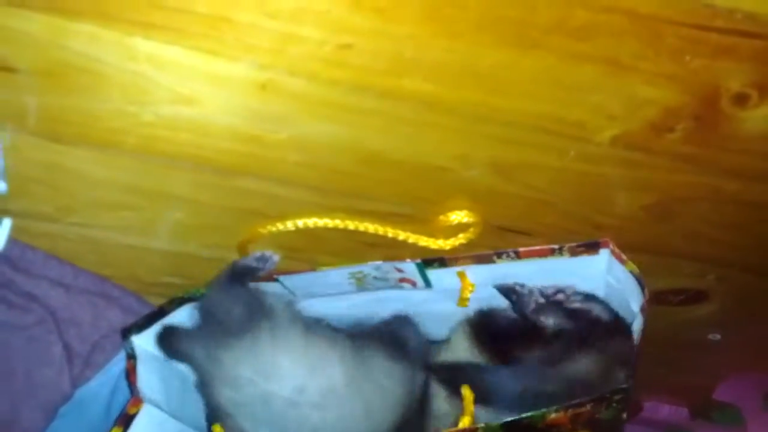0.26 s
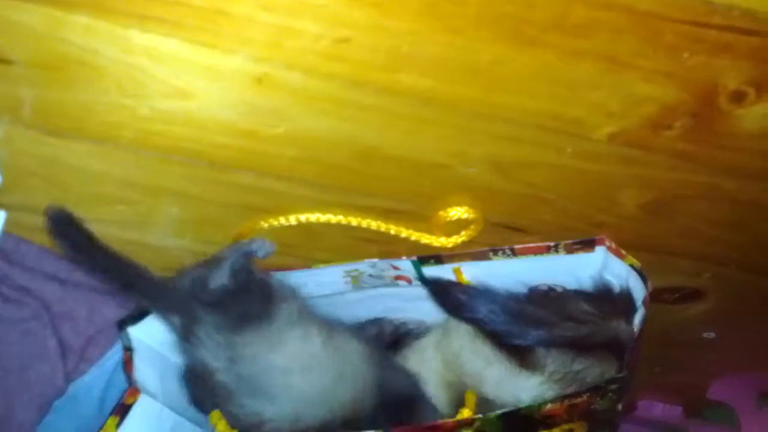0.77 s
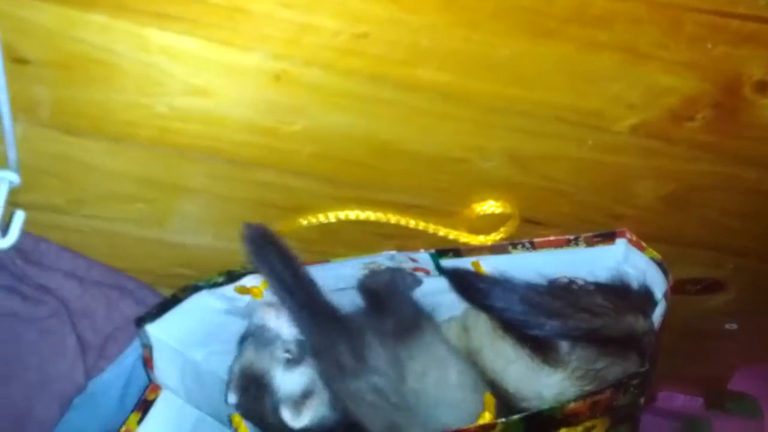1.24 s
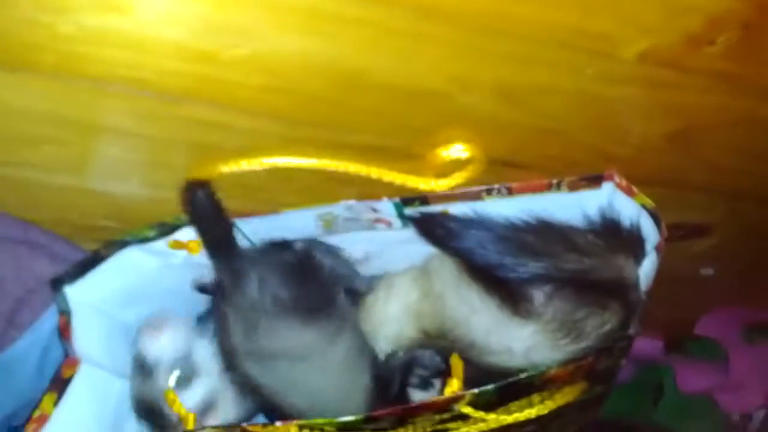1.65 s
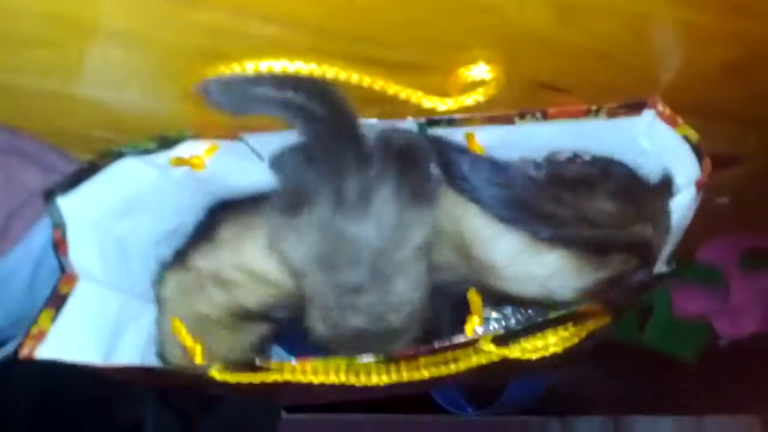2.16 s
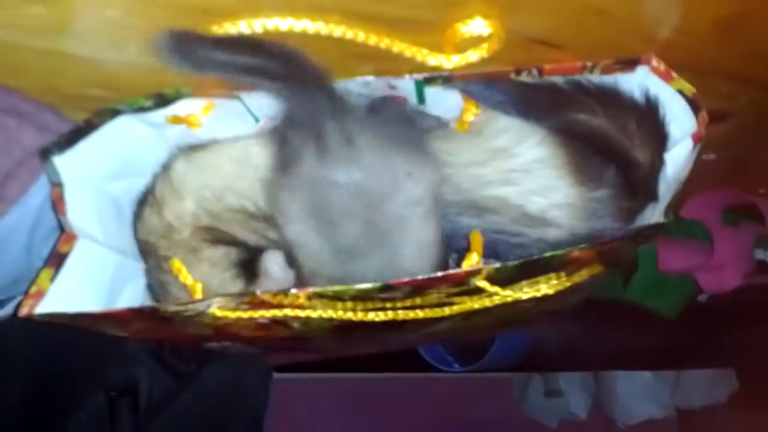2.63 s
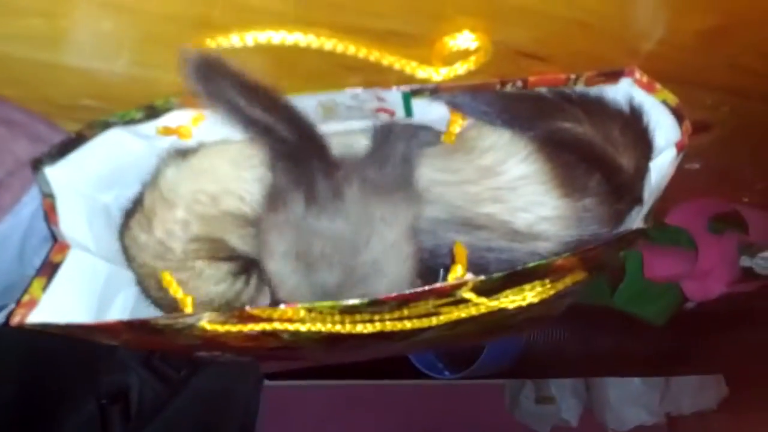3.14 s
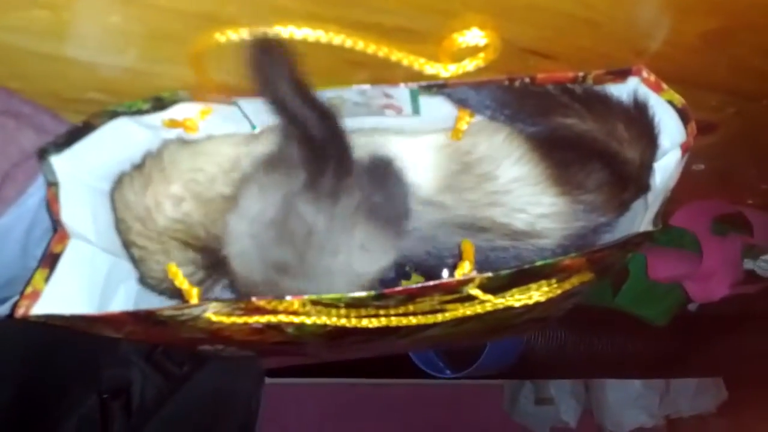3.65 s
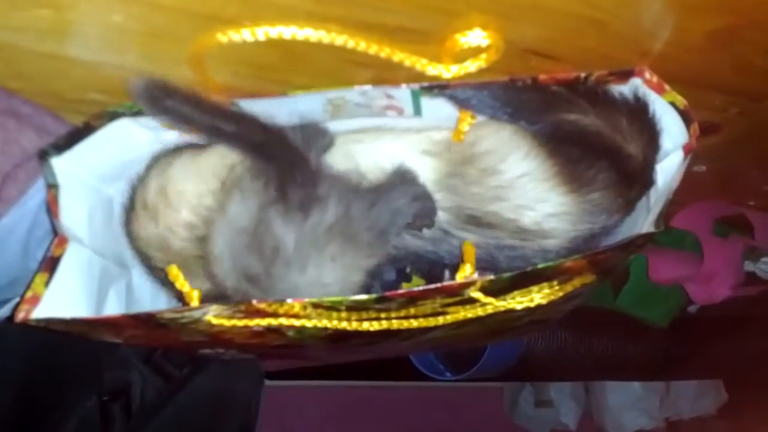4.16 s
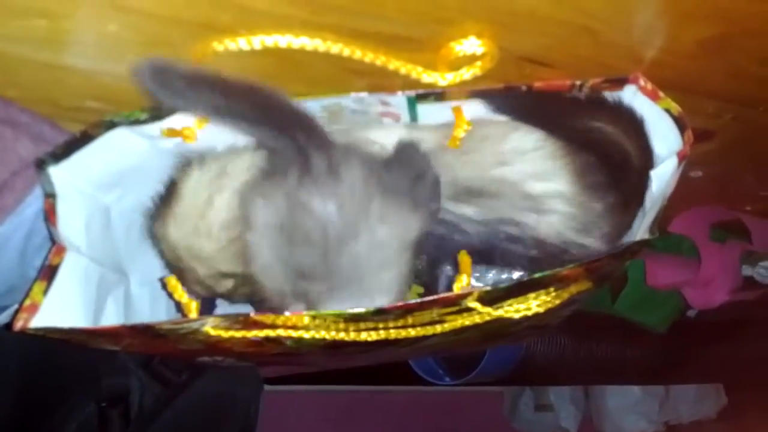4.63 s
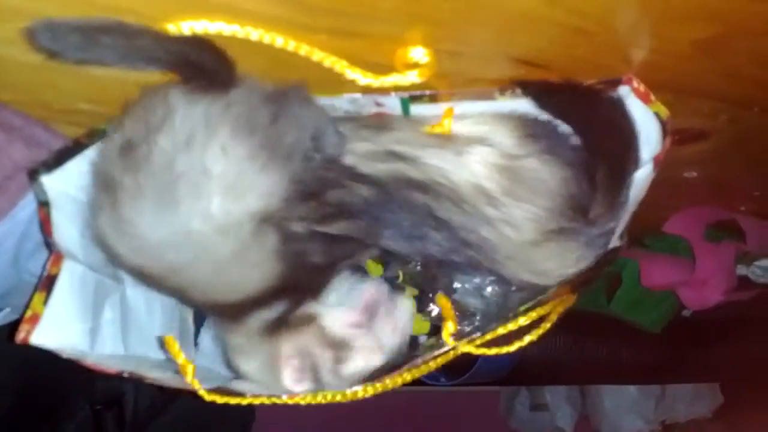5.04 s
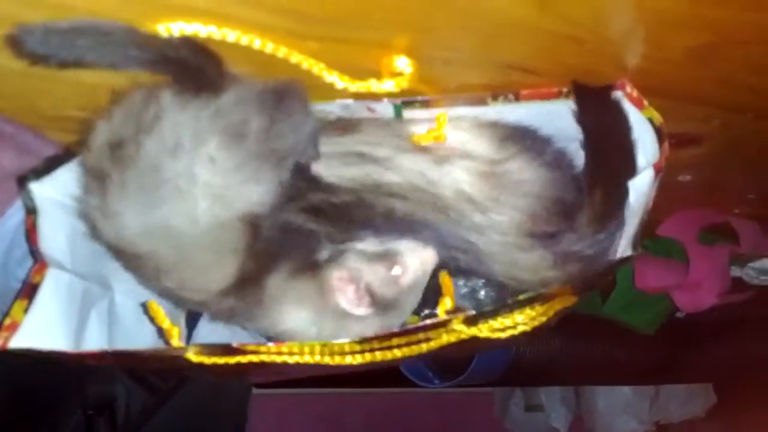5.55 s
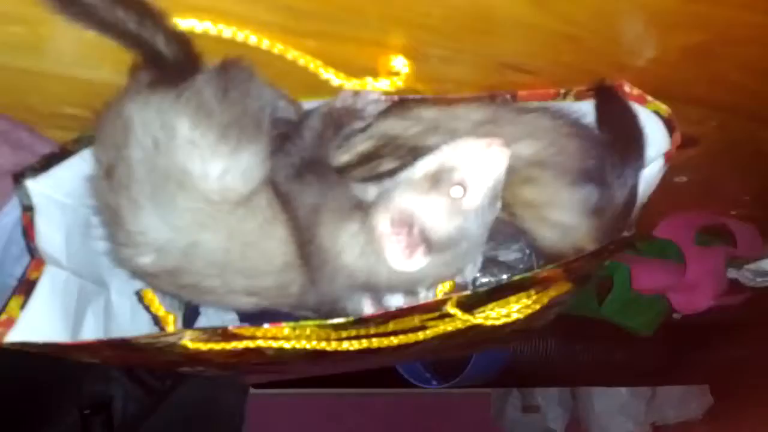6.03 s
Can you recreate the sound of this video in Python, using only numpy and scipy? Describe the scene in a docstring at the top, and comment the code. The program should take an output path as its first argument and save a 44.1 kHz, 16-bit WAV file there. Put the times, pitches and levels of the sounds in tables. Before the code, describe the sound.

Close, dry paper-bag crinkling in uneven bursts as two small furry animals wrestle, creases snapping brightly over scratchy rustle and soft dull thumps.

```python
"""Two ferrets wrestle in a stiff paper gift bag on a wooden floor, close to a small microphone.
Creases snap over one by one: noise cracks with short sine rings of fold and wall.
Fur and claws rustle along the walls as coloured noise grains that follow each stroke.
Bodies thump the bag against the boards as low, swelling sine pushes.
A low room rumble and hiss, coloured noise of slowly drifting level, lie underneath."""
import sys
import numpy as np
from scipy import signal
from scipy.fft import rfft, irfft
from scipy.io import wavfile

SR = 44100
rng = np.random.default_rng(int(sys.argv[2]) if len(sys.argv) > 2 else 0)


def digitize_waveform(pressure):
    """Quantize a signal to 16-bit integers and store it at the path in sys.argv[1].

    Rows of a 2-D input are taken as channels; values are limited to [-1, 1].
    """
    field = np.atleast_2d(pressure).T
    bounded = np.clip(field, -1, 1)
    quanta = np.round(bounded * 32767).astype(np.int16)
    wavfile.write(sys.argv[1], SR, quanta)


N = 277389

# Room tone around the bag, low rumble to hiss: [pitch_hz, density_db_per_hz]
ROOM_SPECTRUM = [(8.8, -28), (15, 6.5), (150, -11.5), (195, -16), (606, -39.5), (910, -48), (2120, -46.5),
                 (4650, -31.5), (8570, -34.5), (12500, -20.5), (15800, -28)]
ROOM_LEVEL_DB = -59.5

# Bodies against the floor: [start_s, peak_db, pitch_hz, swell_s, first_push (1 outward, -1 inward)]
BODY_THUMPS = [(0.344, -47, 46.4, 0.016, -1), (0.382, -48, 53.6, 0.0051, -1), (1.361, -51, 134, 0.0069, 1),
               (1.987, -37, 106, 0.0062, 1), (1.999, -38, 85.5, 0.0096, 1), (2.28, -42.5, 103, 0.0079, 1),
               (3.908, -34, 70.4, 0.0062, 1), (4.816, -40, 48, 0.0099, -1), (5.051, -41, 64, 0.005, -1),
               (5.081, -38, 44.3, 0.0046, -1), (5.296, -37.5, 75.5, 0.0021, 1),
               (5.43, -33.5, 108, 0.00091, 1), (5.45, -43, 97, 0.0044, -1), (5.477, -47, 100, 0.0034, -1),
               (6.079, -49, 89, 0.004, -1)]

# Colour of paper crackle: [pitch_hz, density_db_per_hz]
CRACKLE_SPECTRUM = [(1180, -22.5), (2000, -7), (3160, -6.5), (4240, -1), (6370, -2), (7980, -3.5),
                    (10300, 1), (11000, -0.5), (14200, 4), (15100, 0), (15800, 2)]
# Colour of the flexing walls: [pitch_hz, density_db_per_hz]
FLEX_SPECTRUM = [(71, -15.5), (120, -6), (151, -2.5), (372, -0.5), (414, -5), (1180, -4), (2260, -10.5),
                 (3000, -12.5), (3900, -15.5), (6600, -120)]

# Restless shifting between the strokes: [time_s, bright_rustle_db, dull_flex_db]
RESTLESS_SHIFTING = [(0.0, -52.5, -68), (0.66, -55.5, -65.5), (1.03, -53.5, -65), (1.21, -55, -63.5),
                     (1.61, -52, -61.5), (1.96, -46, -53), (2.14, -47.5, -59), (2.43, -54, -66.5),
                     (2.94, -59.5, -64), (3.28, -54.5, -66), (3.59, -63, -67.5), (4.45, -58, -67.5),
                     (4.62, -46, -60.5), (4.82, -48, -55.5), (5.19, -55, -69), (5.76, -56.5, -64),
                     (6.08, -55.5, -60.5), (6.29, -55.5, -62)]
# Strokes of a body along the paper: [full_strength_s, hold_s, bright_rustle_db, dull_flex_db]
BODY_STROKES = [(0.08, .005, -47.5, -50.5), (0.156, 0.033, -48, -57.5), (0.36, 0.024, -49.5, -51.5),
                (.56, 0.017, -55, -67), (0.819, .005, -38.5, -49.5), (0.937, .05, -46.5, -54),
                (1.122, 0.014, -53, -56), (1.209, .02, -46.5, -61), (1.352, .02, -49.5, -56),
                (1.516, .03, -53.5, -57), (1.719, 0.028, -48.5, -66), (1.775, .005, -42, -48.5),
                (1.884, .04, -41, -53), (1.97, .04, -45.5, -47.5), (2.095, .005, -40.5, -47),
                (2.215, .03, -42, -47.5), (2.365, 0.022, -50.5, -59.5), (2.453, 0.007, -54.5, -59),
                (2.628, .01, -52, -62.5), (2.752, .01, -53, -54), (3.172, .02, -44, -51),
                (3.4, 0.0042, -62, -58), (3.91, .02, -53.5, -63.5), (4.176, .01, -51, -55.5),
                (4.463, .01, -46.5, -49.5), (4.497, .005, -40.5, -47.5), (4.648, .03, -47, -50.5),
                (4.741, .03, -45.5, -52), (4.874, .06, -48.5, -54), (5.049, .02, -50, -53),
                (5.122, .02, -52, -67), (5.178, 0.0081, -57, -53.5), (5.344, 0.0044, -43, -51),
                (5.441, .02, -49.5, -56.5), (5.49, .04, -48.5, -55), (5.853, .03, -56, -65.5),
                (5.918, .04, -50.5, -56), (6.026, .01, -56, -51), (6.082, .01, -52, -59.5),
                (6.222, .06, -50, -59.5)]
STROKE_RISE_DB_PER_S, STROKE_FALL_DB_PER_S = 220.5, 177.5

# Crease snaps and wall knocks, strong and faint, each at its own time:
# [full_swell_s, crack_peak_db, crease_ring_db, panel_knock_db, panel_pitch_hz]
# (the two ring levels are those before the swell and the decay)
TIMED_SNAPS = [(.0341, -23.5, -39, -39.5, 1530), (.064, -14.5, -32, -36.5, 705),
               (.0893, -50, -42, -31.5, 2540), (.1415, -35, -38, -42, 1020), (.1562, -44, -34, -38.5, 1150),
               (.2365, -24.5, -52, -47, 1030), (.2967, -20, -36, -37, 430), (.2988, -18.5, -33, -38, 2470),
               (.3588, -27.5, -57, -53, 510), (.4129, -27.5, -33, -55, 990), (.4832, -31.5, -34, -50, 2120),
               (.5754, -27, -42, -54, 600), (.792, -24, -51, -37.5, 500), (.806, -42, -29.5, -41, 540),
               (.819, -36, -45, -36, 1260), (.8386, -23, -41, -39, 1140), (.8492, -18.5, -47, -43, 1090),
               (.8985, -24.5, -34, -45.5, 1500), (.9454, -22, -52, -50, 1060),
               (.962, -41, -31.5, -46.5, 527), (.9976, -22.5, -40, -39, 387), (1.0669, -37, -43, -53, 870),
               (1.0866, -44, -43, -44, 1130), (1.1245, -38, -46, -50, 390), (1.2202, -15, -33, -51, 2300),
               (1.254, -25, -56, -62, 1040), (1.3024, -29.5, -38, -39.5, 900), (1.353, -37, -56, -48, 1170),
               (1.367, -28, -50, -48, 750), (1.5118, -19.5, -45, -44, 1140), (1.5416, -24, -49, -55, 500),
               (1.7161, -25.5, -31, -41, 1200), (1.7531, -16.5, -27.5, -31, 1270),
               (1.76, -16, -42, -33, 1150), (1.788, -10, -21, -33, 1150), (1.7905, -12.5, -28, -31, 1070),
               (1.7945, -13, -41, -33, 1560), (1.801, -30, -36, -36, 1280), (1.8402, -43, -44, -53, 1320),
               (1.9187, -17, -47, -60, 2340), (1.9337, -31, -49, -57, 330), (1.9383, -41, -47, -34, 1280),
               (1.9588, -19, -46, -34, 1770), (1.9643, -12.5, -28, -46, 640), (1.9677, -23, -29, -27, 730),
               (1.9705, -15, -34, -34, 1870), (1.9898, -27, -37, -30, 905), (1.9985, -22, -36, -28.5, 323),
               (2.0192, -25, -47, -51, 340), (2.0304, -17, -43, -60, 360), (2.0702, -17, -33, -34, 600),
               (2.0766, -24, -36, -33, 1200), (2.0984, -19, -26, -36, 620), (2.105, -25, -34, -33.5, 2440),
               (2.1887, -17, -30, -44, 525), (2.1995, -19, -38, -32, 740),
               (2.2032, -14.5, -41, -28.5, 1220), (2.2147, -17, -40, -41, 1380),
               (2.22, -31, -47, -36, 1320), (2.2306, -23, -29, -38, 1090), (2.2385, -17.5, -24, -36, 644),
               (2.3084, -26, -43, -40.5, 390), (2.3585, -32, -44, -36.5, 950),
               (2.3617, -15.5, -49, -60, 1030), (2.4192, -26, -32, -47, 1380),
               (2.4515, -37, -58, -38.5, 1220), (2.4592, -26.5, -43, -46.5, 442),
               (2.5892, -23, -38, -42, 1140), (2.6194, -24.5, -32, -41.5, 1590),
               (2.6294, -23, -38.5, -57, 950), (2.641, -27, -55, -51, 1250), (2.6908, -27.5, -56, -42, 960),
               (2.706, -29, -54, -45, 1590), (2.7323, -25, -61, -44, 1550), (2.76, -20.5, -55, -33, 1330),
               (2.7741, -20.5, -53.5, -42.5, 1240), (2.7862, -19, -44, -37, 1360),
               (2.8102, -32, -44, -60, 1430), (2.8441, -29, -60, -47, 1420),
               (2.8658, -31.5, -58, -65, 1660), (2.996, -22.5, -37, -35, 1390),
               (3.0854, -26, -51, -44.5, 1480), (3.1174, -19.5, -34, -41, 1350),
               (3.131, -38, -51, -50, 1300), (3.1445, -20, -42, -30, 1130), (3.147, -19, -32, -41.5, 1210),
               (3.162, -16, -38, -37, 1420), (3.1683, -17, -29, -28, 1230), (3.178, -17, -30, -53, 1260),
               (3.1886, -16.5, -33, -29.5, 613), (3.195, -19.5, -54, -32.5, 1420),
               (3.217, -31, -39, -36, 1510), (3.2221, -16, -48, -40, 484), (3.268, -39, -42, -48, 1400),
               (3.3266, -51, -49, -46, 1420), (3.3553, -34, -44, -43, 1300),
               (3.3593, -32, -45, -37.5, 1470), (3.409, -24.5, -48, -32.5, 1390),
               (3.4749, -29, -51, -42, 1230), (3.5323, -25, -57, -49, 480), (3.6255, -62, -60, -48.5, 2620),
               (3.7472, -38.5, -44, -40, 1320), (4.1561, -25, -33, -37.5, 790),
               (4.178, -19.5, -53, -31.5, 1260), (4.1978, -25.5, -39, -40, 1600),
               (4.2412, -27, -50, -48, 1310), (4.2805, -28.5, -41.5, -45.5, 1270),
               (4.4268, -27, -35, -42.5, 1640), (4.46, -19.5, -38, -38, 1300),
               (4.502, -14, -30.5, -36.5, 1520), (4.521, -35, -48, -46, 1630), (4.5578, -45, -53, -61, 750),
               (4.593, -39, -40, -42, 1210), (4.62, -18, -35, -37, 1480), (4.6232, -30, -42, -32, 1530),
               (4.663, -24, -38, -44, 1250), (4.6835, -25, -42, -43, 1160), (4.7, -22, -39, -41, 1250),
               (4.7051, -19, -36, -46, 600), (4.7619, -15.5, -40, -37, 1250),
               (4.8147, -28.5, -54, -60, 2420), (4.8417, -30, -42, -39, 1100), (4.859, -36, -32, -47, 686),
               (4.8727, -39, -37.5, -53, 1100), (4.902, -18, -39, -33, 1310), (4.9074, -23, -31, -34, 1350),
               (4.931, -28, -34, -40, 2000), (4.9757, -26, -32, -31, 1140), (5.017, -45, -44, -36, 623),
               (5.069, -42, -51, -41.5, 1140), (5.138, -33, -45, -43, 1220), (5.166, -50, -72, -44, 546),
               (5.215, -29, -41, -42.5, 475), (5.2976, -58, -61, -34.5, 850), (5.3453, -28, -52, -36, 1460),
               (5.3484, -19, -36, -32, 1290), (5.4309, -45, -37, -39, 815), (5.5214, -43, -33, -39, 1040),
               (5.5842, -30, -35, -37, 1340), (5.811, -54, -62, -37, 760), (5.828, -26.5, -57, -44, 320),
               (5.928, -26, -52, -45, 1610), (5.9733, -54, -61, -43, 860), (6.0228, -50, -57, -28.5, 1000),
               (6.0376, -23, -44, -55, 460), (6.0745, -43, -51, -45, 930)]
FLIP_S = 0.00073   # time for a fold to tear over to its full swell
CRACK_T60_S = 0.0045   # typical; each snap varies around it
SHIVER_T60_S, SHIVER_DB = 0.04, -17   # the paper shivers on after each snap, level against the crack
CREASE_HZ, CREASE_T60_S = 4530, 0.0038   # typical pitch of a fold
PANEL_T60_S = 0.0091

# Further small snaps fall at random, thicker where the rustle is louder
SMALL_COUNT = 80
SMALL_PANEL_HZ, SMALL_PANEL_SPREAD = 1114, 0.408   # typical pitch; spread as a natural-log ratio
SMALL_OVER_RUSTLE_DB, SMALL_SPREAD_DB = 9, 3.5
SMALL_CREASE_DB, SMALL_PANEL_DB = -13, -14   # against the typical small crack

TOP_CUT_HZ = 15800   # upper edge of the sound's band


def amp(db):
    """Turn decibels into an amplitude factor."""
    return 10 ** (np.asarray(db) / 20)


def rms_one(x):
    """Scale a signal to an rms of 1."""
    return x / np.sqrt(np.mean(x ** 2) + 1e-20)


def colour(x, spectrum):
    """Shape by a (Hz, dB) spectrum with a causal, minimum-phase response."""
    hz, db = np.transpose(spectrum)
    grid = np.maximum(np.arange(4097) * SR / 8192, 1)
    log_gain = np.interp(np.log(grid), np.log(hz), db) * np.log(10) / 20
    # folding the cepstrum onto positive time makes the response minimum-phase
    cepstrum = irfft(log_gain)
    cepstrum[1:4096] *= 2
    cepstrum[4097:] = 0
    response = irfft(np.exp(rfft(cepstrum)))
    return signal.fftconvolve(x, response)[:N]


def drift(rate_hz):
    """Slow chance wander with an rms of 1: noise through two equal low-pass poles."""
    pole = np.exp(-2 * np.pi * rate_hz / SR)
    noise = rng.standard_normal(N + SR)
    wander = signal.lfilter([1], [1, -2 * pole, pole * pole], noise)
    return rms_one(wander[SR:])   # the first second lets the filter settle


def fade(t, t60):
    """Exponential decay that loses 60 dB in t60 seconds."""
    return amp(-60 * t / max(t60, 1e-3))


def add(out, start_s, sound):
    """Lay a sound into the scene at its start time."""
    at = max(round(start_s * SR), 0)
    out[at:at + len(sound)] += sound[:N - at]


def room_tone():
    """Rumble and hiss of the room: steady coloured noise whose level wanders a little."""
    level_db = ROOM_LEVEL_DB + 0.63 * drift(3.8)
    noise = rng.standard_normal(N)
    return amp(level_db) * rms_one(colour(noise, ROOM_SPECTRUM))


def thumps():
    """A soft body shoves the bag: a cycle or two of low air push that swells in and dies."""
    out = np.zeros(N)
    t = np.arange(SR // 5) / SR
    for start_s, peak_db, pitch_hz, swell_s, first_push in BODY_THUMPS:
        wall = np.sin(2 * np.pi * pitch_hz * t)
        wall = wall + 0.18 * np.sin(2 * np.pi * 2.52 * pitch_hz * t)   # stiffer overtone
        push = wall * t * np.exp(-t / max(swell_s, 1e-3))
        add(out, start_s, np.sign(first_push) * amp(peak_db) * push / np.abs(push).max())
    return out


def effort():
    """Bright and dull rustle level in dB: each stroke rises, holds and falls over the shifting."""
    t = np.arange(0, N / SR + .01, .002)
    shift_s, *shift_levels = np.transpose(RESTLESS_SHIFTING)
    power = amp([np.interp(t, shift_s, db) for db in shift_levels]) ** 2
    for full_s, hold_s, *levels_db in BODY_STROKES:
        rise_loss = STROKE_RISE_DB_PER_S * np.maximum(full_s - t, 0)
        fall_loss = STROKE_FALL_DB_PER_S * np.maximum(t - full_s - hold_s, 0)
        power = power + amp(np.c_[levels_db] - (rise_loss + fall_loss)) ** 2
    sample_s = np.arange(N) / SR
    return [np.interp(sample_s, t, 10 * np.log10(p)) for p in power]


def grains(clumps, per_s, spread_db, t60, rub):
    """Tiny noise bursts of uneven size over a smooth rub, both following the clumps; rms 1."""
    born = rng.random(N) < per_s * clumps / SR
    sizes = amp(spread_db * np.minimum(rng.exponential(1, N), 3)) * born
    pole = fade(1 / SR, t60)
    # two equal poles: each grain swells and dies
    envelope = signal.lfilter([1], [1, -2 * pole, pole * pole], sizes + 1e-18)
    return rms_one((rms_one(envelope) + rub * clumps) * rng.standard_normal(N))


def rustle(bright_db, dull_db):
    """Fur and claws drag on the paper in small jerks; the walls flex with a duller crumple in step."""
    jerks = amp(2.0 * drift(31))
    crisp = grains(jerks, per_s=250, spread_db=6.0, t60=0.0029, rub=1.9)
    # the hiss of fur and the lower scrape of claws swell apart from each other
    low_pass = signal.butter(2, 7000, fs=SR, output="sos")
    scrape = signal.sosfilt(low_pass, crisp)
    hiss = crisp - scrape
    fine = rms_one(colour(amp(3.5 * drift(11.3)) * scrape + hiss, CRACKLE_SPECTRUM))
    crumple = grains(jerks, per_s=200, spread_db=2.0, t60=0.011, rub=0.56)
    flex = rms_one(colour(crumple, FLEX_SPECTRUM))
    return amp(bright_db) * fine + amp(dull_db) * flex


def small_snaps(bright_db):
    """Rows like those of the timed snaps, drawn by chance where the paper is being worked."""
    share = np.cumsum(amp(.5 * bright_db))
    # one chance draw in each equal share of the rustling
    slot = (np.arange(SMALL_COUNT) + rng.random(SMALL_COUNT)) / SMALL_COUNT
    at = np.minimum(np.searchsorted(share / share[-1], slot), N - 1)
    chance = np.clip(rng.standard_normal((SMALL_COUNT, 4)), -1.5, 1.5)
    typical_db = bright_db[at] + SMALL_OVER_RUSTLE_DB
    part_db = np.c_[[0, SMALL_CREASE_DB, SMALL_PANEL_DB]]
    levels_db = typical_db + SMALL_SPREAD_DB * chance[:, :3].T + part_db
    panel_hz = SMALL_PANEL_HZ * np.exp(SMALL_PANEL_SPREAD * chance[:, 3])
    return np.c_[at / SR, levels_db.T, panel_hz]


def snaps(rows):
    """A crease flips: a brief bright crack, a short ring of the fold and a knock of the flat wall."""
    t = np.arange(SR // 25) / SR
    after = np.maximum(t - FLIP_S, 0)
    swell = np.minimum(t / FLIP_S, 1) ** 2
    out = np.zeros(N)
    paper = colour(np.r_[1, np.zeros(255)], CRACKLE_SPECTRUM)[:256]   # impulse response
    chance = rng.standard_normal((len(rows), 6))
    noise = rng.standard_normal((len(rows), len(t)))
    for (full_s, crack_db, crease_db, panel_db, panel_hz), c, n in zip(rows, chance, noise):
        crack_fade = fade(after, CRACK_T60_S * amp(3.6 * c[4]))
        shiver = amp(SHIVER_DB) * fade(after, SHIVER_T60_S)
        envelope = swell * (crack_fade + shiver)
        # each fold has a sharpness of its own: tight ones are thinner and brighter
        sharpness = np.clip(.5 + 0.64 * c[5], -.3, 1)
        sharp = signal.lfilter([1, -sharpness], [1], n * envelope)
        crack = np.convolve(sharp, paper)[:len(t)]
        fold_hz = CREASE_HZ * (1 + 0.087 * c[0])
        fold = np.sin(2 * np.pi * fold_hz * t) * fade(after, CREASE_T60_S)
        # the wall adds a weaker partial, mostly near half its pitch
        partial_hz = panel_hz * (0.444 + 0.13 * c[2])
        wall = np.sin(2 * np.pi * panel_hz * t) + 0.23 * c[1] * np.sin(2 * np.pi * partial_hz * t)
        knock = np.sign(c[3]) * amp(panel_db) * wall * fade(after, PANEL_T60_S)
        rings = amp(crease_db) * fold + knock
        add(out, full_s - FLIP_S, amp(crack_db) * crack / np.abs(crack).max() + swell * rings)
    return out


def scene():
    """Room, thumps, rustle and snaps sum to one channel."""
    bright_db, dull_db = effort()
    background = room_tone() + thumps()
    paper = rustle(bright_db, dull_db) + snaps(small_snaps(bright_db)) + snaps(TIMED_SNAPS)
    return (background + paper)[None]


def record(dry):
    """A steep elliptic low-pass ends the band at TOP_CUT_HZ."""
    top_cut = signal.ellip(12, .5, 70, TOP_CUT_HZ, fs=SR, output="sos")   # 0.5 dB ripple, 70 dB stop
    return signal.sosfilt(top_cut, dry)


dry = scene()
out = record(dry)
digitize_waveform(out)
```